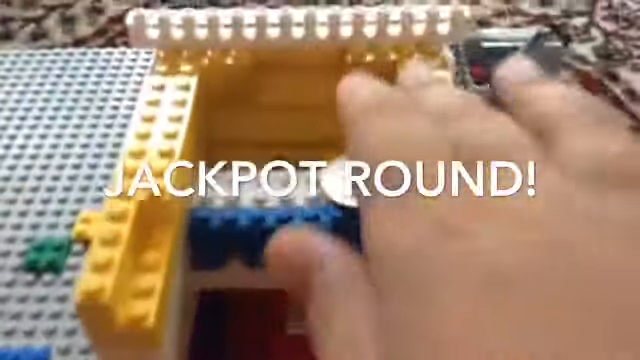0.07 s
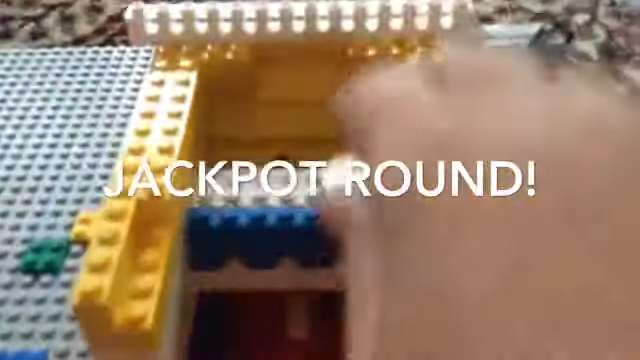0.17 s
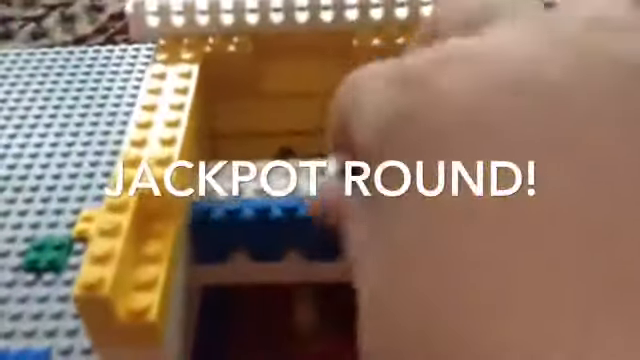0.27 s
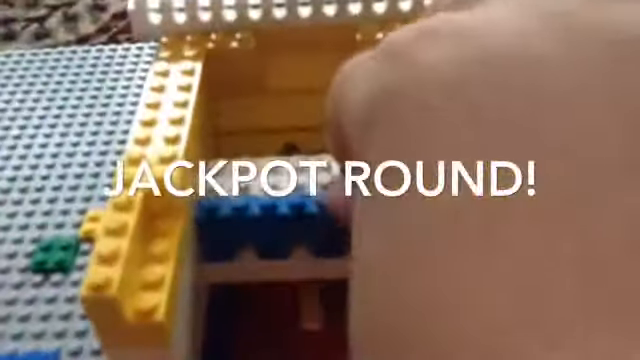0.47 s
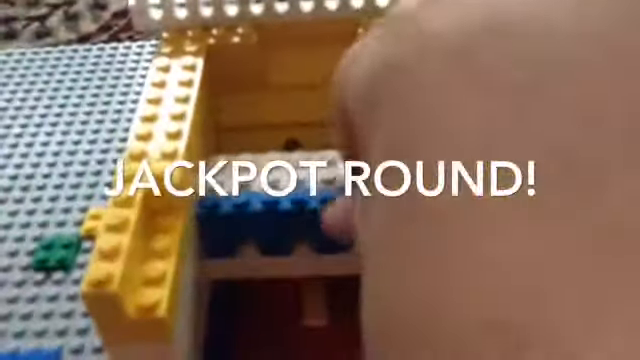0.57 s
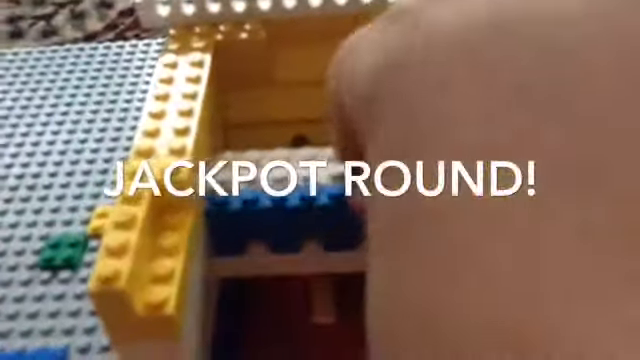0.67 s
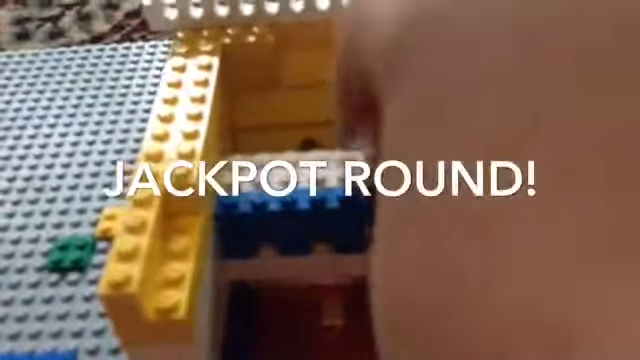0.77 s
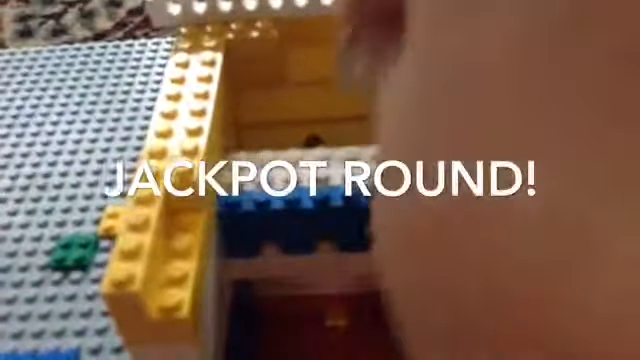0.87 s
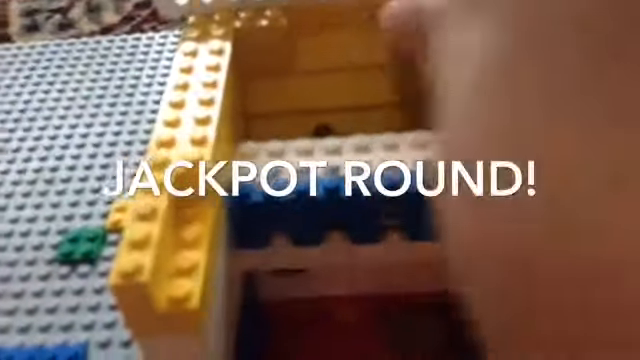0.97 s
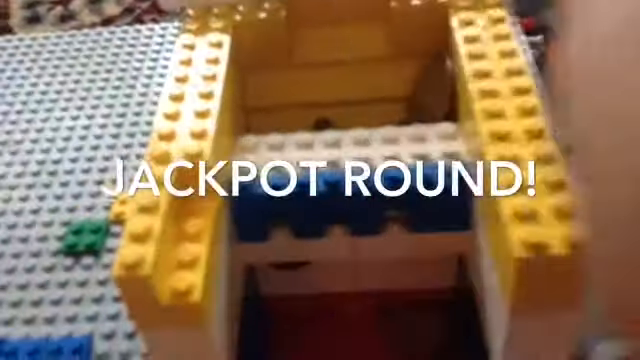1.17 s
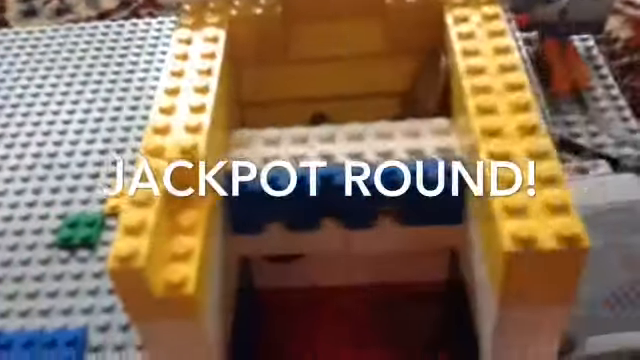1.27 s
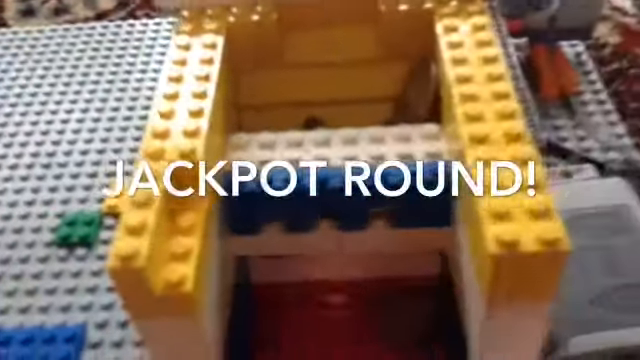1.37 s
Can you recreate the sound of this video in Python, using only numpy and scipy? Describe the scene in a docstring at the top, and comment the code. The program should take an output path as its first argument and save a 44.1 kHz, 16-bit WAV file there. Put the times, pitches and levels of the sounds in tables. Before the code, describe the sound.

Over the constant wavering whine and hissy whirr of a small geared motor, coins strike hollow plastic with a loud clatter that dwindles, then another knock and short tumble; close, dry, small room, thin bass.

```python
"""Coins drop into a small motor-driven machine of plastic toy bricks, close to the microphone.
Each knock rings the struck spot, the brick walls and the hollow body, with a crack of noise.
The coins ring briefly as clusters of high dying sines; low dying sines make the jolts of the machine.
A wavering motor tone and the whirr of gears, dense ticks over hiss, run throughout."""
import sys
import numpy as np
from scipy import signal
from scipy.fft import rfft, irfft
from scipy.io import wavfile
from scipy.ndimage import uniform_filter1d

SR = 44100
rng = np.random.default_rng(int(sys.argv[2]) if len(sys.argv) > 2 else 0)


def convert_level_to_amplitude(level_db):
    """Map a level in decibels to its linear amplitude factor."""
    exponent = np.asarray(level_db, float) / 20
    return 10 ** exponent


def inscribe(sig):
    """Save sig as 16-bit PCM at rate SR to the path in sys.argv[1].

    A 1-D sig is mono; a 2-D sig holds one channel per row.
    Samples are clipped to [-1, 1] before scaling.
    """
    pcm = np.round(np.clip(np.atleast_2d(sig).T, -1, 1) * 32767)
    wavfile.write(sys.argv[1], SR, pcm.astype(np.int16))


N = 61739  # samples, 1.4 s


def evened(x):
    """Scales a signal to rms 1."""
    return x / np.sqrt(np.mean(x ** 2) + 1e-20)


def read(points, hz):
    """Reads a spectrum in dB between its points on a log frequency axis."""
    f, value = np.transpose(points)
    return np.interp(np.log(hz + 1), np.log(f + 1), value)


def curve(table, index):
    """Draws one column of a time table as a value for every sample."""
    table = np.array(table)
    return np.interp(np.arange(N) / SR, table[:, 0], table[:, index])


def add(mix, s, sound):
    """Mixes a sound in at time s, cut off at the end of the mix."""
    part = mix[round(s * SR):][:len(sound)]
    part += sound[:len(part)]


def ring(modes, t, extra_db, detune=1):
    """Struck resonances: a sum of sines, each falling 60 dB in its own t60."""
    hz, db, t60 = np.transpose(modes)[:, :, None]
    decay = convert_level_to_amplitude(db + extra_db - 60 * t / t60)
    return (decay * np.sin(2 * np.pi * hz * detune * t)).sum(0)


def resonance(hz, centre_hz, width_hz):
    """A resonance peak of height 1, half as high at the edges of its width."""
    return 1 / (1 + (2 * (hz - centre_hz) / width_hz) ** 2)


def gear_drive():
    """Gear teeth meshing: dense random ticks over steady hiss."""
    ticks_per_s, tick_spread_db, tick_share = 2500, 2, 0.42  # the share is of the power
    strength = convert_level_to_amplitude(tick_spread_db * np.minimum(rng.exponential(1, N), 5))
    struck = rng.random(N) < ticks_per_s / SR
    ticks = strength * struck * rng.choice([-1, 1], N)
    hiss = rng.standard_normal(N)
    return np.sqrt(tick_share) * evened(ticks) + np.sqrt(1 - tick_share) * hiss


def whirr():
    """Gear ticks and hiss, coloured by the resonances of the housing and of its hollow."""
    # whirr loudness: (time [s], level [dB], hollow part [dB])
    levels = [(0.0, -37, -44), (0.112, -35, -43.5), (0.314, -36.5, -47), (0.552, -39.5, -43),
              (0.724, -38.5, -41.5), (0.954, -39.5, -44.5), (1.4, -40, -47.5)]
    # whirr spectrum: (frequency [Hz], relative level [dB])
    colour = [(24, -81), (40, -58), (98, -61), (129, -21), (198, -20.5), (430, -19), (724, -16.5),
              (820, -8.5), (960, -10), (1190, -33.5), (1820, -16.5), (2460, -13.5), (7020, -15),
              (7950, -19), (13400, -16.5), (15600, -21.5)]
    # housing resonances: (frequency [Hz], width [Hz], boost [dB])
    housing = [(2240, 870, 7), (3060, 160, 4.5), (4000, 830, 4.5), (7020, 430, 5), (9730, 860, 8),
               (13900, 1100, 3)]
    hollow_hz, hollow_width_hz = 1177, 232
    top_hz, patchy_db = 15350, 2.5

    hz, _, z = signal.stft(gear_drive(), SR, nperseg=1024, noverlap=768)
    # smooth random patches over pitch and time make the whirr uneven
    patches = rng.standard_normal(z.shape[::-1]).T
    patches = uniform_filter1d(uniform_filter1d(patches, 14, 0), 10, 1)
    z = z * convert_level_to_amplitude(patchy_db * evened(patches)) * (hz < top_hz)[:, None]

    def coloured(gain):
        """Shapes the spectrum by a gain and returns it as sound of rms 1."""
        sound = signal.istft(z * gain[:, None], SR, nperseg=1024, noverlap=768)[1]
        return evened(sound[:N])

    boost_db = sum(db * resonance(hz, f, width) for f, width, db in housing)
    shell = coloured(convert_level_to_amplitude(read(colour, hz) + boost_db))
    hollow = coloured(resonance(hz, hollow_hz, hollow_width_hz))
    return convert_level_to_amplitude(curve(levels, index=1)) * shell + convert_level_to_amplitude(curve(levels, index=2)) * hollow


def whine():
    """A tone of wavering level, with a faint octave, follows the motor speed."""
    # motor whine: (time [s], frequency [Hz], level before the waver [dB])
    whine_path = [(0.0, 852, -42.5), (0.08, 827, -43), (0.15, 847, -44), (0.21, 850, -44.5),
                  (0.25, 815, -41), (0.33, 835, -58), (0.375, 845, -45), (0.435, 825, -50),
                  (0.52, 863, -51.5), (0.6, 834, -43), (0.69, 844, -45), (0.77, 812, -44.5),
                  (0.875, 838, -46), (0.96, 812, -42.5), (1.05, 850, -45), (1.1, 835, -50.5),
                  (1.2, 858, -46), (1.29, 830, -50), (1.34, 846, -45.5), (1.4, 850, -49)]
    waver_db, octave_db = 1.5, -13
    waver = evened(uniform_filter1d(uniform_filter1d(rng.standard_normal(N), 700), 700))
    phase = 2 * np.pi * np.cumsum(curve(whine_path, index=1)) / SR
    tone = np.sin(phase) + convert_level_to_amplitude(octave_db) * np.sin(2 * phase)
    level = convert_level_to_amplitude(curve(whine_path, index=2) + waver_db * waver)
    return np.sqrt(2) * level * tone  # a sine of peak sqrt(2) has rms 1


def room(x):
    """A short tail of sparse reflections of random sign, dying exponentially."""
    level_db, t60_s = -12.5, 0.041
    taps, at = np.zeros(8000), np.arange(100, 7900, 20)
    signs = rng.choice([-1., 1.], len(at))
    taps[at + rng.integers(0, 20, len(at))] = signs * convert_level_to_amplitude(-60 * at / SR / t60_s)
    return convert_level_to_amplitude(level_db) * signal.fftconvolve(x, taps / np.linalg.norm(taps))[:N]


def thuds():
    """The whole machine jolts and rings in its low modes."""
    # jolts: (time [s], level [dB])
    jolts = [(0.241, -42.5), (0.257, -43), (.494, -52), (1.062, -35.5), (1.112, -47), (1.146, -45),
             (1.256, -51.5)]
    # low modes of the machine: (frequency [Hz], relative level [dB], t60 [s])
    frame = [(217, 0.5, 0.074), (268.6, 7, 0.058), (362, -7, 0.19), (583, 4.5, 0.032)]
    rise_s = 0.0021
    out, t = np.zeros(N), np.arange(4096) / SR
    for s, db in jolts:
        add(out, s, ring(frame, t, db) * (1 - np.exp(-t / rise_s)))
    return out


def coin_rings(ratios, modes, rings, pitches):
    """A struck coin rings in its modes until the next contact damps it."""
    damp_s, attack_s = 0.003, 0.0007
    out, t = np.zeros(N), np.arange(SR // 4) / SR
    for (s, db, until), hz in zip(rings, pitches):
        tones = ring(np.c_[hz * np.array(ratios), modes], t, db)
        damping = np.exp(-np.maximum(t - (until - s), 0) / damp_s)
        add(out, s, tones * damping * np.minimum(t / attack_s, 1))
    return out


def small_coins():
    """Small coins: a long main mode in a cluster of weaker, faster-dying ones."""
    # mode frequencies: (ratio to the main ring)
    ratios = [.94, 1.035, 1.077, 1.086, 1.14, 1.156, 1.195, 1]
    # modes in the same order: (relative level [dB], t60 [s])
    modes = [(-12, .05), (-12, .08), (-14, .1), (-13, .12), (-16, .2), (-18, .15), (-14, .1), (0, 2.0)]
    # rings: (time [s], level [dB], damped from [s])
    rings = [(.241, -19, .262), (.246, -13, .2492), (.254, -17, .2595), (.2605, -14, .264),
             (.266, -15, .2678), (.2688, -18, .277), (.28, -24, .296), (.298, -33, .326), (.345, -30, .403),
             (.437, -39, .458), (.768, -42, .78)]
    # main pitch of each ring: (frequency [Hz])
    pitches = [12985, 12870, 12870, 12765, 12628, 12830, 12624, 12800, 12768, 12770, 12770]
    return coin_rings(ratios, modes, rings, pitches)


def large_coins():
    """Large coins: a single, lower mode of slow decay."""
    # mode frequency: (ratio to the main ring)
    ratios = [1]
    # mode: (relative level [dB], t60 [s])
    modes = [(0, 3.0)]
    # rings: (time [s], level [dB], damped from [s])
    rings = [(1.084, -36, 1.176), (1.0655, -26, 1.071), (1.21, -49, 1.25)]
    # main pitch of each ring: (frequency [Hz])
    pitches = [9448, 9270, 9430]
    return coin_rings(ratios, modes, rings, pitches)


def crack(t, level_db, treble_db):
    """The crack of contact: a coloured noise burst that dies within milliseconds."""
    # crack spectrum: (frequency [Hz], relative level [dB])
    crack_colour = [(1500, 10.5), (3000, 7.5), (5000, 9.5), (7000, 8.5), (9000, 2.5), (11000, 4.5),
                    (13500, 11.5), (15500, -0.5)]
    t60_s, treble_hz = 0.011, 8300
    hz = np.fft.rfftfreq(len(t), 1 / SR)
    shelf_db = treble_db / (1 + (treble_hz / (hz + 1)) ** 4)
    noise = rfft(rng.choice([-1., 1.], len(t)))
    return irfft(noise * convert_level_to_amplitude(read(crack_colour, hz) + shelf_db)) * convert_level_to_amplitude(level_db - 60 * t / t60_s)


def knocks():
    """Each blow rings the struck spot, the walls and the hollow body, with a short crack of noise."""
    # coin on brick: (time [s], relative level [dB], struck spot [Hz], hollow body [dB],
    # crack [dB], crack treble [dB])
    blows = [(0.2402, -4, 1308, 6.5, -16, -18), (0.2411, -1, 2940, -2.5, -14.5, 3.5),
             (0.2422, -9, 3150, -1.5, -7.5, 15.5), (0.248, -41, 3300, -1, 7, 3),
             (0.252, -15.5, 3940, 11, 3.5, -12), (0.2557, -14, 6000, 9, -19, -6),
             (0.2574, -8.5, 3200, -4, -5, -17), (0.2591, -10, 6600, 3, 3.5, -15),
             (0.2672, -17, 3380, -10, -3, -4), (0.2704, -11.5, 3320, -12, -5, 9),
             (0.2812, -20, 3060, -4, 0, -9), (0.292, -26, 5630, 3, 0, -11),
             (0.297, -17.5, 3400, 0, 0.5, -16), (0.3026, -27, 3450, -14, -7, -7),
             (0.316, -19.5, 6460, 7, -4.5, -2), (0.327, -18, 1250, -6, -7, -12),
             (0.3367, -9, 3110, -8, -5, -10), (0.3365, -9.5, 6620, -22, -8, -8),
             (0.3447, -11.5, 3370, -6, -0.5, -3.5), (0.3459, -9.5, 8660, -16, -16, -16),
             (0.3497, -24, 3280, 13, 2, -7), (0.364, -31, 1840, 15, -15, -5),
             (0.368, -22, 1840, 3, -6, -15), (0.3857, -27.5, 3300, 11.5, 1.5, -5),
             (0.4014, -25, 3360, -5, -12, -4), (0.4206, -34, 2070, 14, 12, -28),
             (0.424, -28, 1880, 10, 2, -13), (0.4341, -19, 7630, 11.5, -1.5, 2.5),
             (0.4388, -32, 3460, 16, -13, 0), (0.4716, -24, 2700, 16, 2.5, -2),
             (0.4828, -23.5, 6800, 5, 2, -10), (0.487, -28, 3000, 0, -1, 0),
             (0.4941, -26, 2570, 8.5, -15, -6), (0.495, -23.5, 1600, 21.5, -21, -11),
             (0.4963, -11.5, 1286, -18, -1.5, -10), (0.498, -15.5, 7030, -9, -4.5, -1.5),
             (0.517, -32.5, 1900, -3, 10.5, -9), (0.6415, -25, 1180, 13.5, -11, 1),
             (0.658, -17, 1170, 5.5, -14, -17), (0.6604, -24, 2420, 15, 2.5, -17),
             (0.702, -35, 1790, 22, -17, -8), (0.7674, -18, 2400, -1, -3.5, 0),
             (0.77, -14, 1160, -0.5, -8, -4), (0.808, -26, 1290, 12.5, -20, -3),
             (0.817, -24, 1140, 0, -20, -3), (1.0628, -5.5, 2110, -4, -4, -2.5),
             (1.0631, -6.5, 8020, -23, -9, -4), (1.0642, -7, 1090, -21, -28, 0),
             (1.0634, -11.5, 1830, -24, -18, 0), (1.064, -13.5, 4500, -2, -11.5, 15),
             (1.0643, -9.5, 9270, -39, -11, 19), (1.0667, -23, 9270, -6, -6, -3),
             (1.0735, -16, 3350, 6.5, -8, -8), (1.0767, -29, 1080, -6, -17, -6),
             (1.1085, -19, 2600, 4, -14, -17), (1.1114, -14, 1810, -11, -6, -20),
             (1.1129, -15, 1030, -6, -20, -7), (1.115, -20.5, 2960, 3, -17, -10),
             (1.1356, -23.5, 3330, 8, -7, -13), (1.1439, -24.5, 4500, 3, 4, -17),
             (1.1504, -23, 2020, 9, 1.5, -1), (1.1504, -17, 4530, -0.5, -17, -1),
             (1.2103, -25, 2150, -4, -3.5, -1), (1.2109, -19.5, 4730, -8, -4.5, -13)]
    # brick walls: (frequency [Hz], relative level [dB], t60 [s])
    brick = [(2195, -0.5, 0.015), (2616, -6, 0.034), (3150, 0, 0.026), (3450, -15, 0.081), (4500, 0, 0.019),
             (5510, 2.5, 0.0063), (6420, -1, 0.012), (8500, 10, 0.0038), (9500, -5, 0.0076)]
    # hollow machine body: (frequency [Hz], relative level [dB], t60 [s])
    hollow_body = [(573, -23, 0.048), (1073, -26, 0.14), (1238, -2, 0.016), (1305, -9, 0.021),
                   (1790, -25, 0.069)]
    knock_db, walls_db, off_colour_db = -4, -7, -10
    colour_octaves, detune = 0.43, 0.012  # detune: relative spread of the mode frequencies
    spot_t60_s, contact_s, body_rise_s = 0.014, 0.00015, 0.0026
    thin = signal.butter(2, 800, "high", fs=SR, output="sos")  # the struck face sounds only above about 800 Hz

    out, t = np.zeros(N), np.arange(4096) / SR
    wall_hz = np.transpose(brick)[0][:, None]
    for s, db, spot_hz, body_db, crack_db, treble_db in blows:
        # walls tuned near the struck spot answer loudest
        octaves_off = np.log2(wall_hz / spot_hz)
        nearness = np.exp(-.5 * (octaves_off / colour_octaves) ** 2)
        lean_db = walls_db + off_colour_db * (1 - nearness)
        wall_shift = 1 + detune * rng.standard_normal((len(brick), 1))
        body_shift = 1 + detune * rng.standard_normal((len(hollow_body), 1))

        walls = ring(brick, t, lean_db, wall_shift)
        spot = ring([(spot_hz, 0, spot_t60_s)], t, 0)
        body = ring(hollow_body, t, body_db, body_shift) * (1 - np.exp(-t / body_rise_s))
        face = (1 - np.exp(-t / contact_s)) * (spot + walls + crack(t, crack_db, treble_db))
        add(out, s, convert_level_to_amplitude(db + knock_db) * (signal.sosfilt(thin, face) + body))
    return out


def scene():
    """Coins and knocks with their reflections over the running motor."""
    drops = knocks() + thuds() + small_coins() + large_coins()
    return (drops + room(drops) + whine() + whirr())[None]


def top_cut(x):
    """Nothing passes above the cut-off."""
    return signal.sosfilt(signal.butter(12, 16470, fs=SR, output="sos"), x)


def record(dry):
    """Microphone bass cut, clipping at full scale, then a band limit."""
    low_cut_hz, edge_hz = 140, 15750
    bass_cut = signal.butter(4, low_cut_hz, "high", fs=SR, output="sos")
    clipped = np.clip(signal.sosfilt(bass_cut, dry), -1, 1)
    band_limit = signal.firwin(201, edge_hz, window=("kaiser", 8), fs=SR)[None]
    mix = signal.oaconvolve(clipped, band_limit, "same")
    return top_cut(mix)


dry = scene()
out = record(dry)
inscribe(out)
```